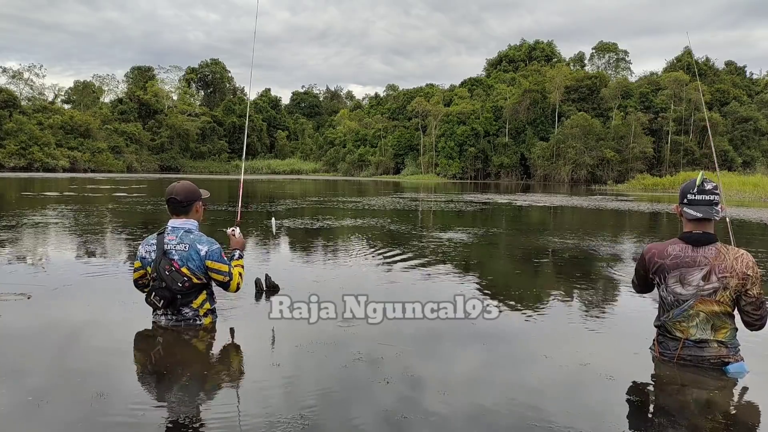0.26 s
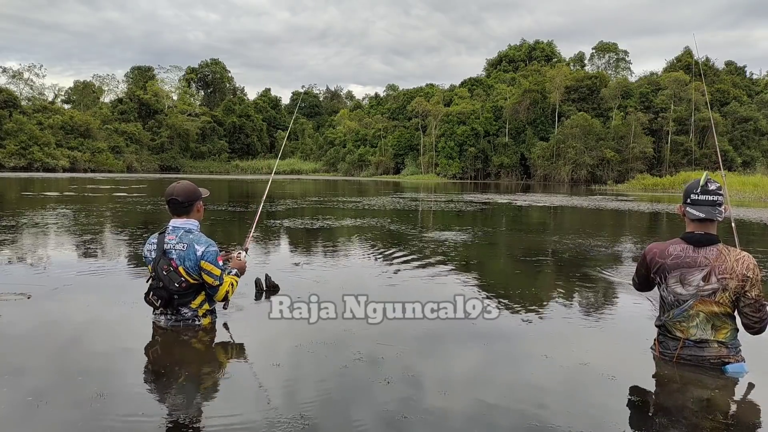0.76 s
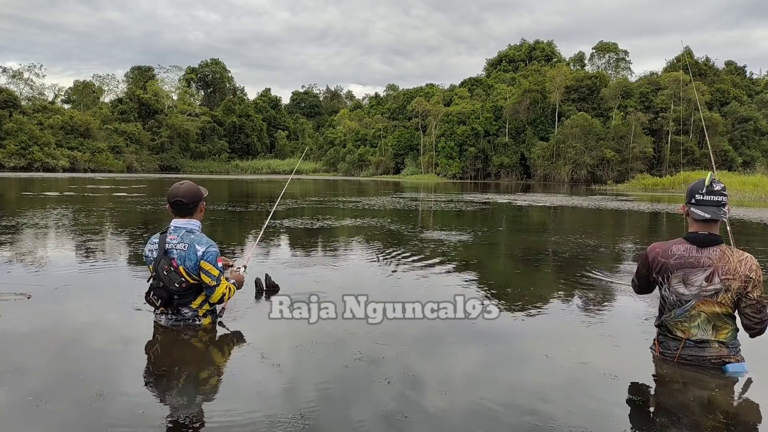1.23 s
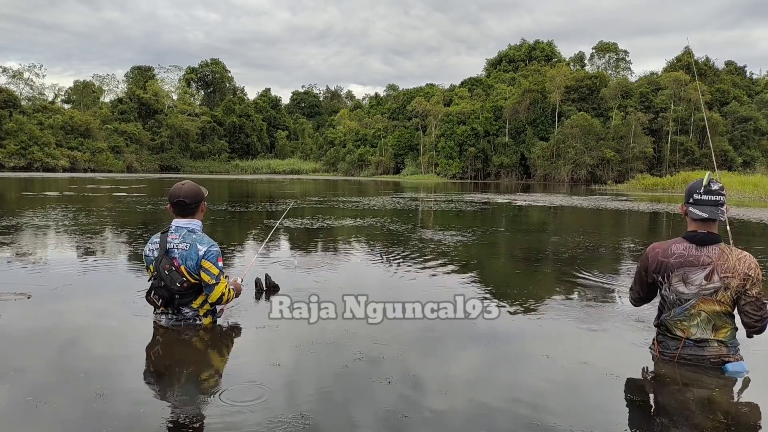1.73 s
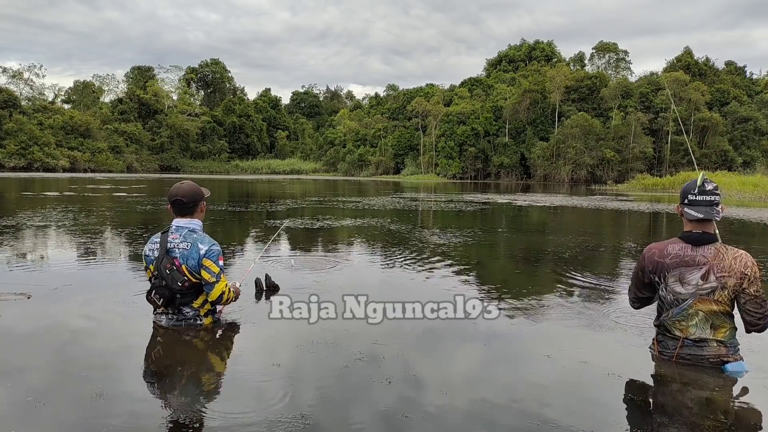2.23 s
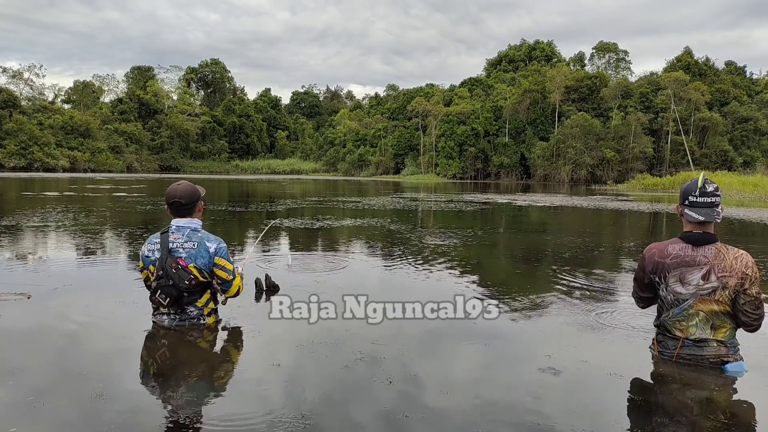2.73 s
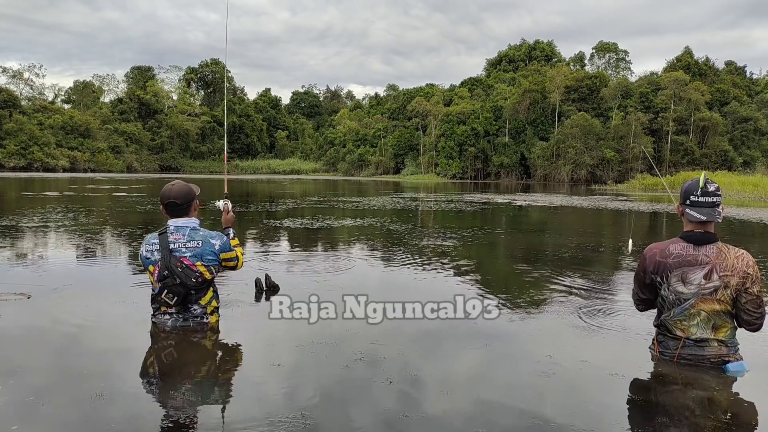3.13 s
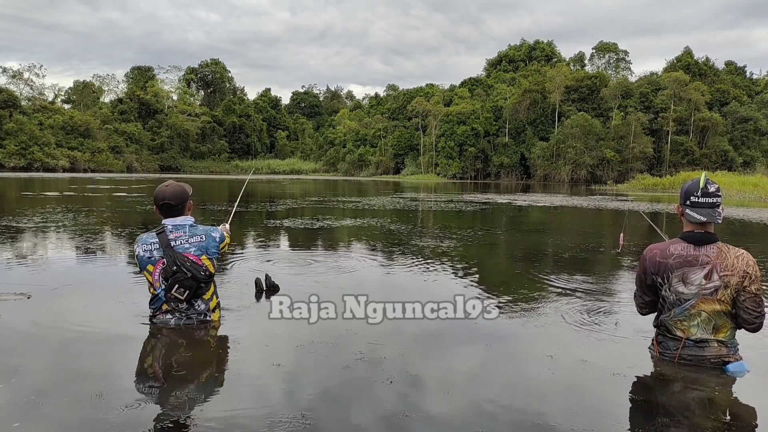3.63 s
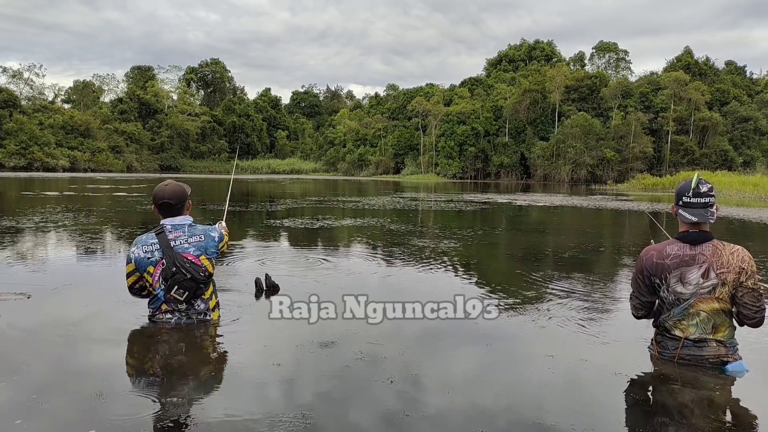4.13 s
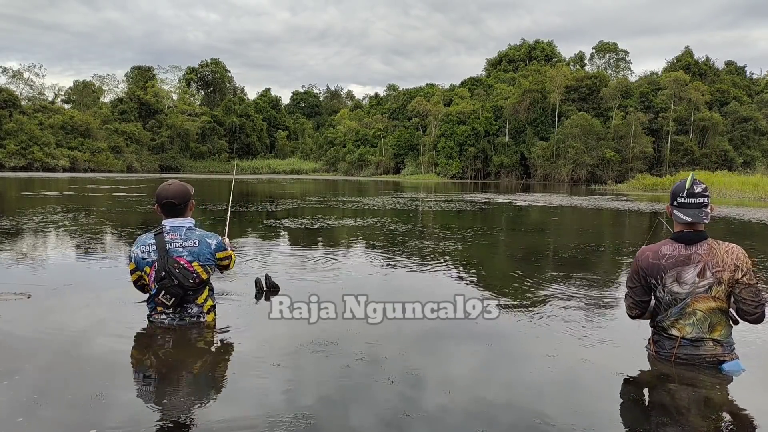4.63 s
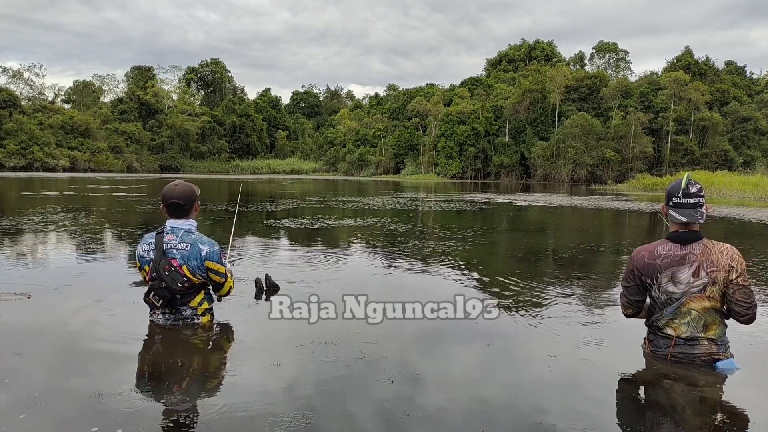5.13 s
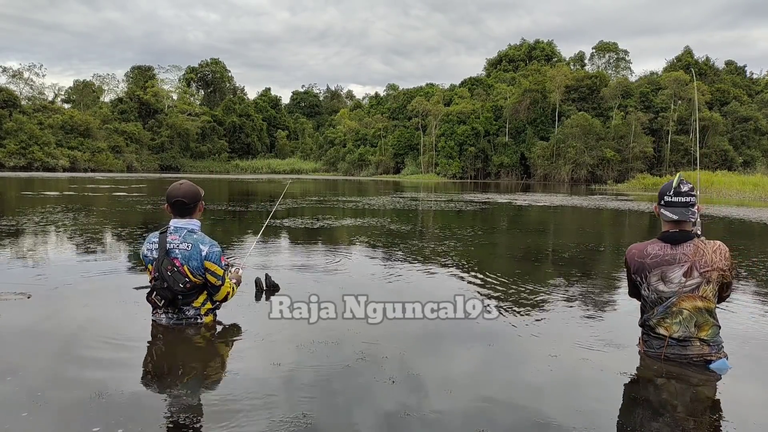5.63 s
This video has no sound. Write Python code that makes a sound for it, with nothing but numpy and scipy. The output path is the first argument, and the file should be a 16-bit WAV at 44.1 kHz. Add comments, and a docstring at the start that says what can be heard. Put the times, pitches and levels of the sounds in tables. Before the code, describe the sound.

A distant cicada chorus drones shrilly and steadily throughout, over faint leaf hiss, low rumble and weak far-off bird twitter that grows slightly. A soft drop sounds at 0.5 s; around 0.8-0.9 s a lure hits the water with ticks, a crisp small splash, a falling slurp and ringing bubbles. Thin ticks follow at 1.1 and 1.5 s. A faint frog croaks repeatedly from 1.2 to 2.5 s, fading. Low dove coos come softly near 1.6, 3.7 and 5.6 s. A small knock clicks at 2.7 s, then tiny bird chips until 3.5 s. At 3.6 s a dull plop and splash land, with fine ticks and spray to about 4 s. A sharp bright click strikes at 4.7 s. Far birds call around 5 s, and a short, loud, hollow creak comes close at 5.4 s. A very faint motor hum emerges after 2 s. Right channel only, dull at the very top.

```python
"""Still forest lake

Cicadas drone in two high bands by tymbal resonance, over filtered-noise leaf hiss, rumble and a far motor's harmonics.
A lure splashes in noise bursts and ringing bubbles, tackle ticks, and something creaks by stick-slip at the microphone.
A frog, a dove and small birds call in gliding tones. The recorder puts everything on the right channel; the left is silent.
Source levels are per side: the recorder's sum of two equal sides adds 6 dB."""
import sys
import numpy as np
from scipy import signal
from scipy.fft import rfft, irfft
from scipy.io import wavfile

SR = 44100
rng = np.random.default_rng(int(sys.argv[2]) if len(sys.argv) > 2 else 0)


def bounce(signal):
    """Save signal as a 16-bit WAV file at the path given by the first command-line argument."""
    frames = np.transpose(np.atleast_2d(signal))
    limited = np.clip(frames, -1, 1)
    pcm = np.round(limited * 32767).astype(np.int16)
    wavfile.write(sys.argv[1], SR, pcm)


N = 258867


def undb(db):
    """Logarithmic level: decibels to amplitude gain."""
    return 10 ** (np.asarray(db) / 20)


def unit(x):
    """Normalisation: scale to rms 1."""
    return x / np.sqrt(np.mean(x ** 2))


def band(x, hz, width):
    """Butterworth band-pass: a maximally flat top between two skirts."""
    edges = np.clip([hz - width / 2, hz + width / 2], 20, SR / 2.05)
    return signal.sosfilt(signal.butter(2, edges, "bandpass", fs=SR, output="sos"), x)


def walk(rate):
    """Slow random modulation: normal random knots, `rate` per second, joined by straight lines."""
    knots = rng.standard_normal(int(N / SR * 40) + 2)
    return np.interp(np.arange(N) / SR * min(rate, 39), np.arange(len(knots)), knots)


def decay(t, t60):
    """Exponential decay: a fall of 60 dB in t60 seconds."""
    return np.exp(-np.log(1000) * t / t60)


def add(out, s, x):
    """Superposition: mix x into out from time s."""
    i = int(s * SR)
    out[i:i + len(x)] += x[:N - i]


def ring(hz, t60, glide=0., rise=.0004, sag=0.):
    """Damped resonance: its pitch may glide exponentially, or start low by the share `sag` and settle."""
    t = np.arange(int(.12 * SR)) / SR
    envelope = (1 - np.exp(-t / rise)) ** 2 * decay(t, t60)
    pitch = hz * np.exp(glide * t) * (1 - sag * np.exp(-t / .0008))
    return envelope * np.sin(2 * np.pi * np.cumsum(pitch) / SR)


def note(length, start_hz, end_hz, rough):
    """Narrow-band scattering: distance and foliage smear a gliding tone into a band of noise by the share `rough`."""
    u = np.linspace(0, 1, int(length * SR))  # 0 to 1 through the note
    pitch = end_hz + (start_hz - end_hz) * (1 - u) ** 1.44
    phase = 2 * np.pi * np.cumsum(pitch) / SR
    knot_position = u * length * end_hz * .25 * rough
    a, b = (np.interp(knot_position, np.arange(400), knots) for knots in rng.standard_normal((2, 400)))
    smeared = a * np.sin(phase) + b * np.cos(phase)
    tone = np.sqrt(1 - rough) * np.sin(phase) + np.sqrt(rough) * smeared
    return np.sin(np.pi * u ** 1.04) ** 0.71 * tone


def burst(s, rise, t60, hz, width, db):
    """Band-limited grainy noise: swells fast to its peak at s and decays; returns its start time and sound."""
    d = np.arange(SR // 2) / SR - .1  # time from the peak
    grain_db = 3 * np.repeat(rng.standard_normal(SR // 200 + 1), 100)[:SR // 2]
    grains = rng.standard_normal(SR // 2) * undb(grain_db)
    swell = np.where(d < 0, np.exp(-(d / rise) ** 2), decay(np.abs(d), t60))
    return s + d[0], undb(db) * swell * unit(band(grains, hz, width))


# resonances of the cicada bodies: (f/Hz, width/Hz, relative level/dB)
CICADA_MODES = [(6470, 610, -10.5), (6876, 600, -1.5), (7154, 440, -2.5), (7620, 510, -1),
                (8110, 390, -13.5), (9000, 830, -3.5), (9670, 910, -10)]


def cicadas(db):
    """Impulse-excited resonance: thousands of uneven tymbal clicks a second ring the bodies of a distant chorus."""
    chorus = 0
    for hz, width, mode_db in CICADA_MODES:
        chance = rng.random((N, 2))
        clicks = (chance[:, 0] < 6000 / SR) * (chance[:, 1] - .5)  # 6000 per second on average
        chorus = chorus + unit(band(clicks, hz, width)) * undb(mode_db + 1.18 * walk(16))
    return unit(chorus) * undb(db + .5 * walk(3.25))


# slosh, patter and spray: (centre f/Hz, width/Hz)
SPLASH_BANDS = [(830, 1200), (2400, 2300), (11500, 8600)]
# splashes: (peak t/s, rise/s, t60/s, slosh level/dB, patter level/dB, spray level/dB)
SPLASHES = [(.8, 0.011, 0.31, -61, -45, -49.5), (0.899, .006, 0.053, -47, -57, -65),
            (3.614, 0.023, 0.28, -42, -47, -41), (3.66, .023, 0.22, -46.5, -54, -56),
            (3.999, 0.084, 0.93, -70, -54.5, -54.5)]


def splashes():
    """Turbulent water noise: each splash bursts in three bands at once."""
    out = np.zeros(N)
    for s, rise, t60, *band_db in SPLASHES:
        for (hz, width), db in zip(SPLASH_BANDS, band_db):
            add(out, *burst(s, rise, t60, hz, width, db))
    return out


# bubbles under the lure: (t/s, initial f/Hz, level/dB)
BUBBLES = [(.802, 3390, -34.5), (0.818, 2060, -35), (.829, 1515, -30), (.879, 455, -37), (.89, 475, -33),
           (.893, 823, -27.5), (.9, 950, -34), (.907, 1100, -32.5)]
BUBBLE_CYCLES, BUBBLE_GLIDE_PER_S = 45, 6.9  # cycles at the initial pitch to fade by 60 dB; rise of the pitch


def bubbles():
    """Bubble resonance: each rings with rising pitch, longer when low."""
    out = np.zeros(N)
    for s, hz, db in BUBBLES:
        add(out, s, undb(db) * ring(hz, BUBBLE_CYCLES / hz, BUBBLE_GLIDE_PER_S, rise=0.00032))
    return out


# water closing over the lure: (t/s, length/s, start f/Hz, end f/Hz, level/dB, roughness 0-1)
SLURPS = [(0.832, .04, 1650, 540, -39, .6)]


def slurp():
    """Falling resonance: the closing water sounds as a partly noisy downward glide."""
    out = np.zeros(N)
    for s, length, start_hz, end_hz, db, rough in SLURPS:
        add(out, s, undb(db) * note(length, start_hz, end_hz, rough))
    return out


# drops and small knocks: (t/s, initial f/Hz, t60/s, level/dB)
KNOCKS = [(.474, 1670, .05, -50), (.787, 2070, .011, -32), (.788, 1500, .022, -33),
          (.7945, 1990, .012, -35), (.797, 840, 0.031, -39.5), (.83, 2690, 0.022, -34.5),
          (.8865, 2390, 0.0087, -26.5), (.917, 1260, 0.035, -41), (2.725, 650, .015, -39),
          (2.727, 1140, 0.011, -31.5), (3.612, 460, .04, -27.5), (3.611, 1494, 0.039, -33.5),
          (4.671, 4220, 0.012, -27), (4.672, 3200, 0.0089, -21.5), (4.675, 3550, .012, -32)]
KNOCK_GLIDE_PER_S = -5.5


def knocks():
    """Damped free vibration: each drop or knock rings once and sags a little in pitch."""
    out = np.zeros(N)
    for s, hz, t60, db in KNOCKS:
        add(out, s, undb(db) * ring(hz, t60, KNOCK_GLIDE_PER_S, rise=.00021))
    return out


# tackle and spray ticks: (t/s, noise rms level before decay/dB, centre f/Hz, width/Hz)
TICKS = [(.779, -38.5, 11500, 4000), (.784, -43, 8300, 3000), (.788, -34.5, 11200, 8000),
         (.795, -36, 11300, 8000), (.796, -50, 4200, 1500), (.842, -39, 3000, 2000),
         (.867, -40, 13500, 4000), (.8855, -43.5, 5500, 8000), (1.098, -36.5, 12600, 5000),
         (1.47, -38, 12500, 6000), (2.362, -41.5, 10000, 4000), (2.726, -36, 9000, 4000),
         (2.729, -34, 9100, 2500), (2.729, -42, 3200, 3000), (2.868, -48, 11000, 6000),
         (3.311, -44, 13000, 5000), (3.7633, -33, 12900, 6000), (3.7653, -37, 12400, 6500),
         (3.969, -45, 13100, 5000), (3.997, -40, 13800, 4000), (4.017, -38, 12300, 6000),
         (4.044, -42, 13000, 5000), (4.672, -31, 9750, 8000), (4.676, -43, 10000, 9000)]
TICK_T60_S = 0.012


def ticks():
    """Impulsive contact: very short decaying bursts of band-limited noise."""
    out, t = np.zeros(N), np.arange(SR // 20) / SR
    for s, db, hz, width in TICKS:
        click = unit(band(rng.standard_normal(len(t)), hz, width))
        add(out, s, undb(db) * click * decay(t, TICK_T60_S))
    return out


# slips: (t/s, level/dB, free time/s, pitch factor)
CREAK_SLIPS = [(5.415, -20.5, 0.0022, 0.76), (5.418, -14.5, 0.0022, 1.07), (5.4213, -14.5, 0.0042, 1.04),
               (5.426, -14.5, 0.0051, 1.013),         (5.433, -26.5, 0.0032, 0.85)]
# hollow body: (f/Hz, share of the pitch missing at the start, rise/s, t60/s, relative level/dB)
CREAK_BODY = [(327, 0.063, 0.0011, 0.025, 6), (1394, 0.84, 0.00048, 0.093, 2.5)]


def creak():
    """Stick-slip: five slips push a hollow body inward; it tightens and rings until the contact grips again."""
    out = np.zeros(N)
    for s, db, free, pitch in CREAK_SLIPS:
        for hz, sag, rise, t60, mode_db in CREAK_BODY:
            tone = ring(hz * pitch, t60, rise=rise, sag=sag)
            grip = np.exp(-(np.arange(len(tone)) / SR / free) ** 4)
            add(out, s, -undb(db + mode_db) * tone * grip)
    # the dull colour of the creak
    out = signal.sosfilt(signal.butter(6, 1830, fs=SR, output="sos"), out)
    return signal.sosfilt(signal.butter(2, 140, "highpass", fs=SR, output="sos"), out)


# a frog's croaks, fading as it tires: (t/s, end f/Hz, level/dB)
CROAKS = [(1.214, 1100, -44), (1.374, 1154, -40), (1.557, 1158, -42), (1.748, 1152, -42.5),
          (1.958, 1145, -42), (2.003, 1096, -52.5), (2.169, 1093, -53), (2.346, 1091, -55),
          (2.5, 1093, -56)]
CROAK_S, CROAK_ROUGH = .032, .08
CROAK_DROP_HZ_PER_DB, CROAK_FLAT_DB = 11.5, -57  # a stronger croak starts higher; at this level it is flat


def frog():
    """Level-dependent glide: the stronger the croak, the higher it starts above its end pitch."""
    out = np.zeros(N)
    for s, hz, db in CROAKS:
        drop_hz = CROAK_DROP_HZ_PER_DB * max(db - CROAK_FLAT_DB, 0)
        add(out, s, undb(db) * note(CROAK_S, hz + drop_hz, hz, CROAK_ROUGH))
    return out


# a dove's coos: (t/s, length/s, level/dB)
COOS = [(1.61, .24, -53), (3.68, .28, -54), (5.55, .31, -53.5)]
COO_START_HZ, COO_END_HZ = 403, 410


def dove():
    """Pure-tone phonation: each coo is a smooth tone that rises slightly."""
    out = np.zeros(N)
    for s, length, db in COOS:
        add(out, s, undb(db) * note(length, COO_START_HZ, COO_END_HZ, 0))
    return out


# a small bird's chips: (t/s, start f/Hz, level/dB)
CHIPS = [(.66, 3600, -53), (2.846, 3700, -54.5), (2.992, 3700, -52), (3.151, 3800, -52.5),
         (3.305, 3800, -55), (3.462, 3800, -49), (4.11, 3550, -52.5), (5.658, 3750, -52),
         (5.832, 3800, -50.5)]
CHIP_S, CHIP_DROP_HZ, CHIP_ROUGH = .035, 75, 0.603
# other far birds: (t/s, length/s, start f/Hz, end f/Hz, level/dB, roughness 0-1)
FAR_BIRDS = [(1.083, .062, 3250, 3210, -52.5, 0.56), (1.244, 0.13, 3200, 3390, -55.5, .4),
             (1.423, .05, 3100, 2790, -53.5, 0.85), (1.589, .045, 3050, 2900, -52.5, 0.73),
             (1.752, 0.056, 2980, 3250, -53.5, 0.9), (4.009, 0.11, 1800, 1306, -50.5, .8),
             (4.233, .036, 1370, 1314, -51.5, 0.48), (4.954, 0.076, 3350, 3660, -51, 0.8),
             (4.984, .135, 2940, 2770, -48.5, .65), (5.273, 0.025, 2030, 2106, -50, .4),
             (5.515, .032, 3040, 3020, -51, 0.63), (5.694, 0.036, 2960, 3160, -50.5, 0.58)]


def birds():
    """Frequency glides: brief falling chips of one bird, and the rising or falling notes of far ones."""
    out = np.zeros(N)
    for s, hz, db in CHIPS:
        add(out, s, undb(db) * note(CHIP_S, hz, hz - CHIP_DROP_HZ, CHIP_ROUGH))
    for s, length, start_hz, end_hz, db, rough in FAR_BIRDS:
        add(out, s, undb(db) * note(length, start_hz, end_hz, rough))
    return out


# far twitter: (centre f/Hz, spread either way/Hz, mean notes per s, lowest level at t = 0/dB)
TWITTER = [(3494, 550, 45, -70.5), (1894, 700, 23, -69)]


def twitter(t):
    """Random superposition: many far notes at chance times, growing louder by 1.45 dB per second."""
    out = np.zeros(N)
    for hz, spread_hz, rate, db in TWITTER:
        chance = rng.random((400, 5))
        starts = np.cumsum(2 * chance[:, 0] / rate)
        for s, (_, pitch, bend, length, size) in zip(starts, chance):
            if s < t[-1]:
                f = hz + spread_hz * (2 * pitch - 1)
                call = note(.02 + .05 * length, f * (.95 + .12 * bend), f, .8)
                add(out, s, undb(db + 6.9 * size + 1.45 * s) * call)
    return out


def with_trees(calls, t):
    """Diffuse reverberation: decaying noise convolved with the calls gives their returns from the trees."""
    tail_t = t[:SR // 3]
    trees = rng.standard_normal(SR // 3) * decay(tail_t, 0.4)
    return calls + undb(-42) * signal.fftconvolve(calls, trees)[:N]


# faint rustles: (peak t/s, centre f/Hz, noise rms level at the peak/dB)
RUSTLES = [(2.451, 2300, -59), (3.1, 3720, -64), (3.2, 2000, -53.5), (4.41, 1650, -54), (4.42, 3400, -52.5),
           (4.589, 1590, -56.5), (4.591, 3180, -53), (4.791, 3500, -52), (5.36, 2930, -52.5),
           (5.55, 1700, -52), (5.686, 1470, -53), (5.83, 1610, -51)]
RUSTLE_RISE_S, RUSTLE_T60_S, RUSTLE_WIDTH_HZ = 0.024, 0.33, 990


def rustles():
    """Band-limited noise: faint narrow bursts that swell and die away."""
    out = np.zeros(N)
    for s, hz, db in RUSTLES:
        add(out, *burst(s, RUSTLE_RISE_S, RUSTLE_T60_S, hz, RUSTLE_WIDTH_HZ, db))
    return out


# spectral shape of rumble, leaves and treble hiss: (f/Hz, relative level per Hz/dB)
AIR_SPECTRUM = [(18, -50), (30, -23), (48, -20.5), (85, -5), (130, 1.5), (208, -4.5), (400, -10.5),
                (728, -15), (1800, -17.5), (3400, -17), (4300, -22), (5500, -27.5), (10500, -26),
                (14300, -25.5), (15500, -23.5)]
HISS_DB = -58  # steady overall level of the treble hiss of far insects


def air(rumble_db, leaf_db):
    """Third-octave noise: each band flickers alone; rumble and leaves swell apart, the treble has a steady level."""
    f = np.maximum(np.arange(N // 2 + 1) * SR / N, 1)
    shape_hz, shape_db = np.transpose(AIR_SPECTRUM)
    colour = rfft(rng.standard_normal(N)) * undb(np.interp(np.log(f), np.log(shape_hz), shape_db))
    rumble, leaves, hiss = np.zeros((3, N))
    for step in range(28):
        hz = 31.25 * 2 ** (step / 3)
        # neighbouring shares overlap and sum to one
        share = np.cos(np.pi / 2 * np.clip(3 * np.log2(f / hz), -1, 1)) ** 2
        layer = rumble if hz < 420 else leaves if hz < 4500 else hiss
        layer += irfft(colour * share, N) * undb(walk(9.8))
    leaf_swell = undb(leaf_db + 0.88 * walk(5.97))
    return unit(rumble) * undb(rumble_db) + unit(leaves) * leaf_swell + unit(hiss) * undb(HISS_DB)


MOTOR_HZ = 52.33  # mean firing rate
# harmonics: (multiple of the firing rate, relative level/dB)
MOTOR_HARMONICS = [(2, -2.5), (3, 2), (4, -5), (5, -11.5)]
# loudness of the hum: (t/s, gain level/dB)
MOTOR_LEVEL = [(0, -90), (2.5, -58.5), (4.5, -55), (5.87, -56.5)]


def motor(t):
    """Harmonic series: a far engine sounds multiples of its firing rate, wavering over the water."""
    phase = 2 * np.pi * np.cumsum(MOTOR_HZ * (1 + 0.00372 * walk(1.625))) / SR
    hum = sum(undb(db + 1.12 * walk(11)) * np.sin(k * phase) for k, db in MOTOR_HARMONICS)
    return hum * undb(np.interp(t, *np.transpose(MOTOR_LEVEL)))


# slow swell of the background: (t/s, rumble level/dB, leaf hiss level/dB, cicada level/dB)
SWELL = [(0, -53, -56, -52.5), (1.2, -53.5, -54.5, -52), (1.9, -53.5, -56, -52.5), (2.8, -53.5, -55.5, -51),
         (3.8, -52, -54, -52.5), (5.2, -53, -56.5, -51.8), (5.87, -51.5, -54, -53)]


def scene():
    """Linear superposition: all sources add, heard alike from both sides."""
    t = np.arange(N) / SR
    s, *columns = np.transpose(SWELL)
    rumble_db, leaf_db, cicada_db = (np.interp(t, s, c) for c in columns)
    water = splashes() + bubbles() + slurp() + knocks()
    animals = with_trees(frog() + dove() + birds() + twitter(t), t)
    background = rustles() + air(rumble_db, leaf_db) + motor(t)
    lake = cicadas(cicada_db) + water + ticks() + creak() + animals + background
    return np.array([lake, lake])


def record(dry):
    """Elliptic low-pass: both sides are summed onto the right channel and the top is cut at 15.4 kHz."""
    low_pass = signal.ellip(10, .2, 60, 15400, fs=SR, output="sos")
    right = signal.sosfilt(low_pass, dry.sum(axis=0))
    return np.array([np.zeros(N), right])


dry = scene()
out = record(dry)
bounce(out)
```